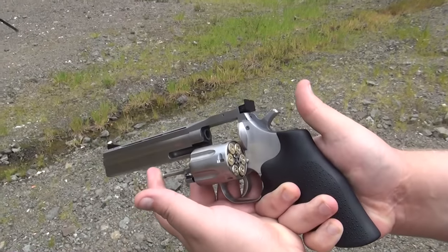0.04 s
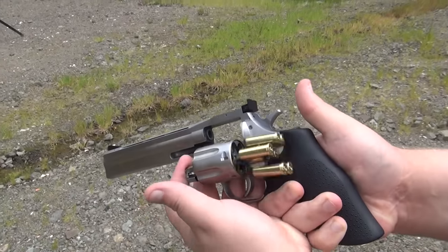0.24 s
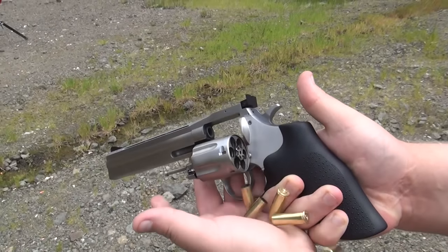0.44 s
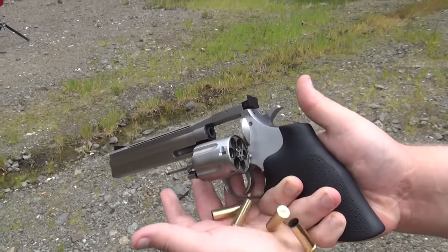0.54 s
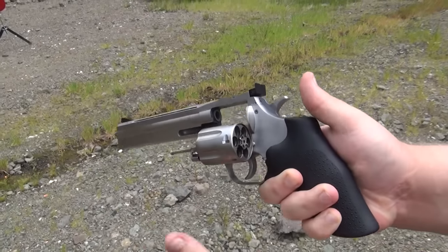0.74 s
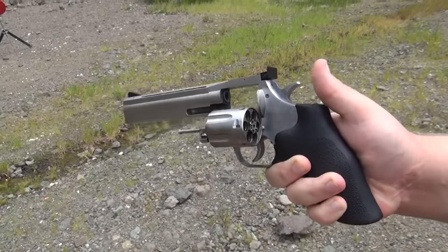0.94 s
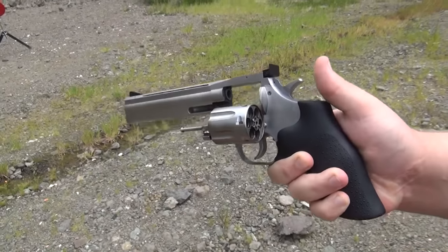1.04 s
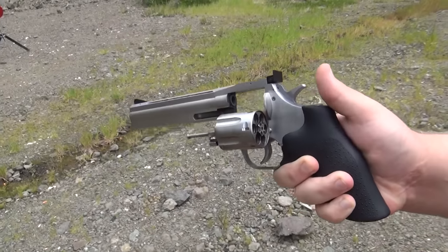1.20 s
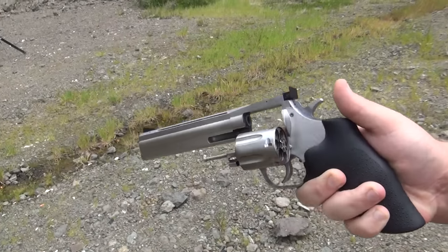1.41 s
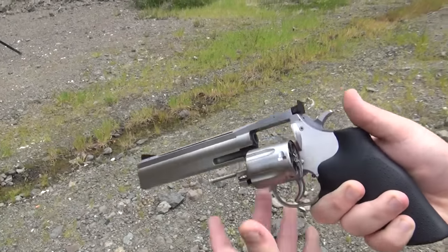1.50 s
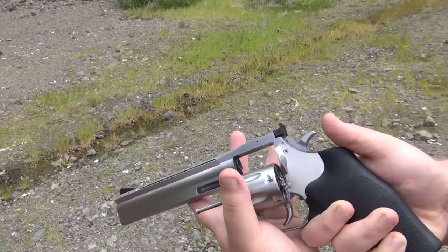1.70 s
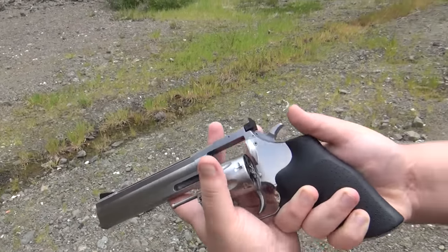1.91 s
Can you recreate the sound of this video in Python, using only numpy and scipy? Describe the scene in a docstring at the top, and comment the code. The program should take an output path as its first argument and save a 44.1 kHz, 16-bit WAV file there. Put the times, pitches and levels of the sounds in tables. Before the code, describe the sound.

Empty brass casings scrape from a revolver and jingle into a palm, close up outdoors.

```python
"""Faint outdoor air, then a hollow knock close to the microphone: six spent brass cases are pushed out of a
revolver cylinder. They scrape from the chambers, pop free and tumble ringing into a palm, each ring cut off
when the next case starts to ring. Then they are set down: they knock, thud and settle with small clinks. The
brass is dry and just right of centre, with a little scatter from hand, gun and gravel."""
import sys
import numpy as np
from scipy import signal
from scipy.fft import rfft, irfft, next_fast_len
from scipy.io import wavfile
from scipy.ndimage import map_coordinates

SR = 44100
rng = np.random.default_rng(int(sys.argv[2]) if len(sys.argv) > 2 else 0)


def wrap_up_sound(samples):
    """Save the sound to the file named by the first command line argument, as 16-bit audio."""
    columns = np.atleast_2d(samples).T
    # keep every value between -1 and 1, then stretch to whole-number steps
    tamed = np.clip(columns, -1, 1)
    steps = np.round(tamed * 32767).astype(np.int16)
    wavfile.write(sys.argv[1], SR, steps)


N = 85995
TURN = 2 * np.pi


def amp(db):
    """Decibels to gain."""
    return 10 ** (np.asarray(db) / 20)


def unit(x):
    """Scale to rms 1."""
    return x / np.sqrt(np.mean(x ** 2) + 1e-20)


def add(track, s, sound):
    """Mix a sound in at s seconds."""
    i = round(s * SR)
    track[i:i + len(sound)] += sound[:N - i]


def brief():
    """Time axis of one short sound."""
    return np.arange(SR // 8) / SR


def decay(t, t60):
    """A gain that falls 60 dB in t60 seconds."""
    return amp(-60 * t / t60)


def wobble(rate, t):
    """A smooth random curve, rate knots a second."""
    return map_coordinates(rng.standard_normal(4096), [t * rate], mode="wrap")


def rough_tone(phase, rough, rate, t):
    """A sine whose level and phase flutter rate times a second."""
    return np.sin(phase) + rough * (wobble(rate, t) * np.sin(phase) + wobble(rate, t) * np.cos(phase))


def coloured(x, points):
    """x through a minimum-phase filter with the given (Hz, dB) shape."""
    size = 2 * next_fast_len(x.shape[-1] // 2 + 1024)
    hz, db = np.transpose(points)
    gain = amp(np.interp(np.log(np.fft.rfftfreq(size, 1 / SR) + 1), np.log(hz + 1), db))
    cepstrum = irfft(np.log(gain + 1e-9))
    cepstrum[1:size // 2] *= 2
    cepstrum[size // 2 + 1:] = 0
    return irfft(rfft(x, size) * np.exp(rfft(cepstrum)), size)[..., :x.shape[-1]]


# Spectrum of the open air around the microphones: (frequency [Hz], level [dB])
AIR_COLOUR = [(25, -4.5), (70, 2.5), (280, 2.5), (1200, -4.5), (2400, -11.5), (15000, -17)]


def outdoor_air(level_db=-57, side_db=-10):
    """Faint, steady air and hiss, nearly the same at both microphones."""
    mid, side = unit(coloured(rng.standard_normal((2, N)), AIR_COLOUR))
    side = side * amp(side_db)
    return amp(level_db) * np.array([mid + side, mid - side])


# Hollow notes of chambers, case mouths and landings: (time [s], level [dB], pitch [Hz], t60 [s])
HOLLOW_KNOCKS = [(.139, -25, 1550, 0.0094), (0.1574, -18.5, 1800, 0.0097), (0.194, -26, 1940, 0.059),
                 (.2246, -15.5, 1380, 0.03), (0.341, -19, 1007, 0.0091), (0.3906, -7.5, 2920, .017),
                 (0.5479, -10.5, 8320, 0.014), (.5482, -7.5, 2710, 0.0039), (.901, -29.5, 1810, 0.0077),
                 (1.0421, -11.5, 690, 0.004), (1.0427, -12.5, 1590, 0.0073), (1.0603, -13, 605, 0.0024),
                 (1.106, -31, 687, 0.072), (1.254, -25, 1020, 0.0083), (1.291, -34, 2500, 0.0086),
                 (1.3517, -23, 1240, 0.0048), (1.691, -37.5, 1040, 0.014)]


def hollow_knocks():
    """Each knock is one rough, damped resonance; such small bodies radiate little below it."""
    out, t = np.zeros(N), brief()
    for s, db, hz, t60 in HOLLOW_KNOCKS:
        tone = rough_tone(TURN * hz * t, rough=.65, rate=hz / 2, t=t)
        low_cut = signal.butter(2, .72 * hz, "highpass", fs=SR, output="sos")
        add(out, s, signal.sosfilt(low_cut, amp(db) * decay(t, t60) * tone))
    return out


# Spectra of a click's body and of its treble: (frequency [Hz], level [dB])
CLICK_BODY = [(300, -34), (900, -13), (1600, -1), (3000, 2.5), (6000, 1), (9000, -20)]
CLICK_TREBLE = [(2500, -25.5), (5000, -9), (9500, 4.5), (13500, -4)]
# Hard contacts of brass and steel, close up: (time [s], body level [dB], treble level [dB])
METAL_CLICKS = [(.1572, -29.5, -33.5), (.1947, -26, -26), (0.221, -16.5, -36.5), (0.2255, -17, -17),
                (.243, -15.5, -21), (0.2547, -39, -13), (0.2644, -32, -12.5), (0.2745, -34, -13.5),
                (0.2784, -34, -33), (0.2984, -34, -18), (.331, -27.5, -28.5), (0.339, -16.5, -12),
                (0.3429, -16, -12), (.375, -22, -17.5), (0.3907, -31, -13.5), (.429, -38, -24),
                (.459, -29, -59), (0.4669, -28, -10.5), (0.4745, -20.5, -19), (0.4828, -22, -13),
                (0.4957, -19, -17.5), (0.5045, -23, -33), (.511, -30, -29), (0.5485, -29, -53),
                (0.6293, -30, -24.5), (0.887, -40, -44), (1.0422, -25.5, -20.5), (1.059, -23, -19.5),
                (1.097, -33.5, -37), (1.1244, -28, -11), (1.1279, -26, -18), (1.141, -18.5, -16.5),
                (1.1451, -28.5, -17.5), (1.1854, -39, -28), (1.259, -39.5, -30.5), (1.3517, -32.5, -24),
                (1.4006, -46, -39), (1.4127, -35, -29.5), (1.4232, -39.5, -28.5), (1.432, -41, -37),
                (1.4472, -41, -31.5), (1.46, -40.5, -41)]


def metal_clicks(level_span_s=0.001):
    """Each hard contact is a sharp crack with a short metallic tail, in a body and a treble band."""
    out, t = np.zeros(N), brief()
    envelope = decay(t, t60=0.0046) + amp(-14.5) * decay(t, t60=0.028)
    for s, body_db, treble_db in METAL_CLICKS:
        for db, colour in ((body_db, CLICK_BODY), (treble_db, CLICK_TREBLE)):
            burst = envelope * rng.standard_normal(len(t))
            burst[0] += 3.1  # the first spike stands above the rattle
            crack = coloured(burst, colour)
            span_rms = np.sqrt(np.sum(crack ** 2) / (level_span_s * SR))
            add(out, s, amp(db) * crack / span_rms)
    return out


# Spectrum of the sliding metal: (frequency [Hz], level [dB])
SLIDE_COLOUR = [(350, -16), (1400, 3), (2200, -3), (2850, 9), (4200, 0), (5200, 2.5), (8400, 3.5),
                (12500, 0), (15000, -7)]
# Loudness curve of brass sliding on steel and on brass: (time [s], level [dB])
SLIDE_LEVELS = [(.193, -37.5), (.225, -31), (.338, -29), (.354, -39), (.385, -39.5), (.445, -63.5),
                (.478, -38), (.56, -68), (1.031, -63), (1.045, -42.5), (1.1, -61.5), (1.132, -29),
                (1.169, -55.5), (1.225, -68), (1.25, -53), (1.5, -57.5)]


def brass_scrape(slips_per_s=2600, low_hz=916, high_hz=16200, jitter_db=3.5):
    """Dense tiny slips of metal on metal, each a brief ring at its own pitch, over a fine hiss."""
    t, age = np.arange(N) / SR, np.arange(SR // 100) / SR
    hiss = 0.4 * rng.standard_normal(N)
    count = int(slips_per_s * N / SR)
    when, pitch, size = rng.random(size=(count, 3)).T[..., None]
    hz = low_hz + (high_hz - low_hz) * pitch
    grains = -np.log(size) * np.sin(TURN * hz * age) * decay(age, t60=0.005)
    positions = (when * N).astype(int) + np.arange(len(age))
    slips = np.bincount(positions.ravel(), grains.ravel(), N)[:N]
    grit = unit(coloured(unit(slips) + hiss, SLIDE_COLOUR))
    level_db = np.interp(t, *np.transpose(SLIDE_LEVELS), left=-np.inf, right=-np.inf)
    return grit * amp(level_db + jitter_db * wobble(220, t))


# The ring shifts as the cases take turns and press on each other: (time [s], pitch [Hz])
CASE_PITCH = [(.315, 6308), (.345, 6252), (.415, 6330), (.55, 6290), (1.15, 6280), (1.3, 6310)]
# Cases ringing near the microphone; jangle sets the upper overtone, the chatter and the neighbours:
# (time [s], level [dB], t60 [s], relative jangle [dB])
CASE_RINGS = [(.2553, -22, 0.63, -7), (.297, -13.5, 0.18, -12.5), (.328, -14.5, 1, -27),
              (.373, -8, 0.095, -16.5), (.407, -17, 0.79, -16.5), (.429, -25.5, 1, -25),
              (.475, -6, 0.068, -14.5), (.4964, 0, 0.018, -21), (.5047, -15, 0.14, -17),
              (.5485, -17.5, 0.28, -26.5), (.63, -10.5, 0.18, -35), (.85, -54.5, 0.61, -5.5),
              (1.0428, -37.5, 0.39, -2.5), (1.1413, -27, 0.24, -6.5), (1.236, -40, 0.38, -7),
              (1.308, -53.5, .35, 3), (1.352, -48, 1, -8)]


def case_rings(attack_s=0.00034, damp_s=0.0016, rub_s=0.0017, stilled_at_s=1.485, neighbour_hz=124):
    """A thin case mouth rings in three modes and chatters on its neighbours until the next is touched."""
    out, t = np.zeros(N), np.arange(N) / SR
    starts = [s for s, *_ in CASE_RINGS] + [stilled_at_s]
    # A ring that starts on a click is struck; the others are rubbed and swell in.
    struck = [min(abs(s - hit) for hit, *_ in METAL_CLICKS) < .004 for s in starts]
    for k, (s, db, t60, jangle_db) in enumerate(CASE_RINGS):
        attack = attack_s if struck[k] else rub_s
        release = damp_s if struck[k + 1] else rub_s
        length = starts[k + 1] - s
        age = t[t < length + 10 * release]
        gate = (1 - np.exp(-age / attack)) * np.exp(-np.maximum(age - length, 0) / release)
        hz = np.interp(s + age, *np.transpose(CASE_PITCH))
        overtone_hz = 2.408 * hz + rng.normal(scale=45)
        modes = (hz, db, t60), (2 * hz, db - 33, t60 / 2), (overtone_hz, db + jangle_db, .65 * t60)
        for mode_hz, mode_db, mode_t60 in modes:
            phase = TURN * np.cumsum(mode_hz) / SR
            detune, offset = rng.uniform(-1, 1, size=(2, 4, 1))  # four neighbours beat against it
            neighbour_phases = phase + TURN * neighbour_hz * detune * age + np.pi * offset
            neighbours = 2 * amp(jangle_db) * np.mean(np.sin(neighbour_phases), axis=0)
            chattering_case = rough_tone(phase, rough=amp(jangle_db - 3), rate=260, t=age)
            add(out, s, amp(mode_db) * decay(age, mode_t60) * gate * (chattering_case + neighbours))
    return out


# Soft, heavy landings of the cases: (time [s], level [dB])
LANDING_THUDS = [(0.271, -41), (0.482, -35.5), (1.1244, -9)]


def landing_thuds(push_s=0.0054):
    """Each landing is a single push of air with a slow rebound."""
    out, progress = np.zeros(N), brief() / push_s
    for s, db in LANDING_THUDS:
        add(out, s, amp(db) * (1 - progress) * np.exp(-progress))
    return out


def nearby_scatter(x, level_db=-17, t60=0.13):
    """Hand, gun and gravel scatter a short diffuse tail back to one microphone."""
    t = brief()
    tail = rng.standard_normal(len(t)) * decay(t, t60)
    return amp(level_db) * signal.fftconvolve(x, tail / np.linalg.norm(tail))[:N]


def scene(side_db=-19, right_db=0.53):
    """Outdoors, a stereo pair close to the hands, with the brass just right of centre."""
    contacts = metal_clicks() + hollow_knocks() + brass_scrape()
    mid = contacts + case_rings() + landing_thuds()
    side = amp(side_db) * signal.hilbert(mid).imag  # the microphones differ slightly in phase
    direct = np.array([mid + side, mid - side]) * amp([[-right_db], [right_db]])
    scatter = np.array([nearby_scatter(contacts) for _ in range(2)])
    return direct + scatter + outdoor_air()


def record(dry, top_hz=15900):
    """The recorder keeps nothing above its band limit."""
    size = next_fast_len(N + 4096)
    hz = np.fft.rfftfreq(size, 1 / SR)
    low_pass = 1 / np.sqrt(1 + (hz / top_hz) ** 160)
    return irfft(rfft(dry, size) * low_pass, size)[:, :N]


dry = scene()
out = record(dry)
wrap_up_sound(out)
```